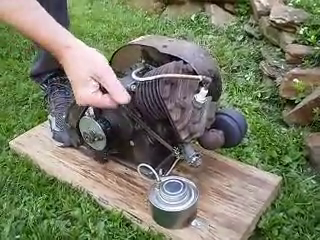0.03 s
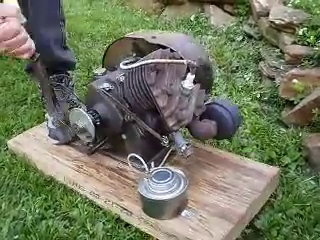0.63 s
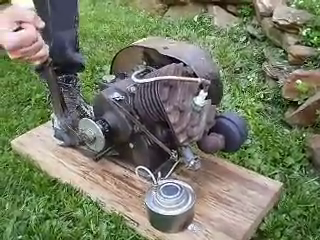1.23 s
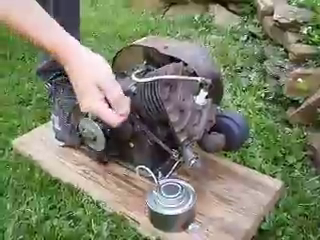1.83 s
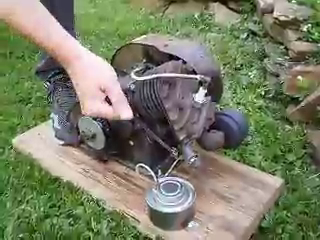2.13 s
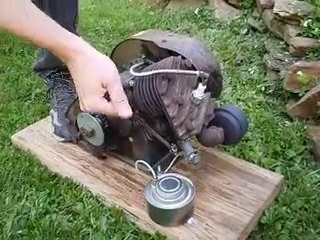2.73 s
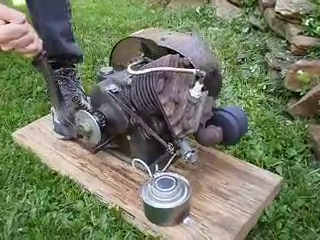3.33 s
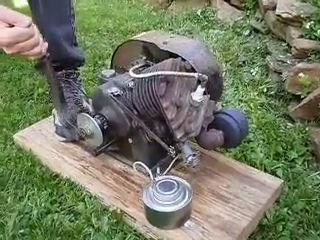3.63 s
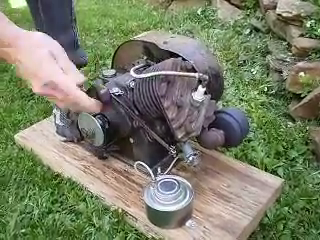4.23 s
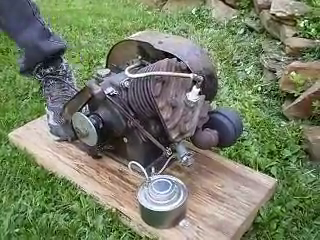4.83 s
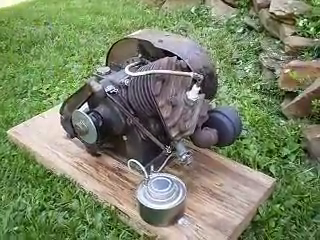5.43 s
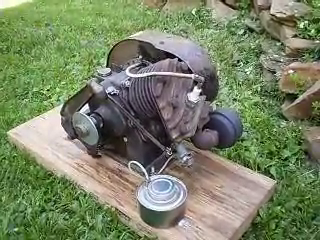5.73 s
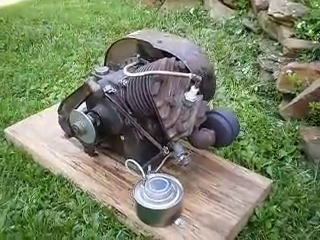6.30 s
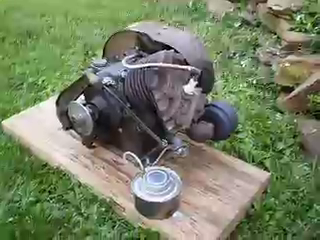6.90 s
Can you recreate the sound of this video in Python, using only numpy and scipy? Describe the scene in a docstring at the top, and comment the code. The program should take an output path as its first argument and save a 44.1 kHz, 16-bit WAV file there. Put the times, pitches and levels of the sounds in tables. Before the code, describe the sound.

A starter lever grinds and knocks outdoors; the single-cylinder engine fails once, then fires up into loud, regular bangs over metallic rattling.

```python
"""An old single-cylinder engine on a plank in a quiet garden is pulled over with a ratchet lever.
On the first pull the lever grinds and knocks; the engine only puffs, sucks and coasts to rest,
and the pawl rattles back. On the second pull, near 3 s, it sags, catches and races, then settles
into firing on every other cycle: bangs and soft chuffs ring the silencer over the clatter of
the valve gear. The bangs overload the microphone."""
import sys
import numpy as np
from scipy.fft import rfft, irfft, next_fast_len
from scipy.io import wavfile
from scipy.ndimage import map_coordinates

SR = 44100
rng = np.random.default_rng(int(sys.argv[2]) if len(sys.argv) > 2 else 0)


def to_wav(s):
    """Save 16-bit WAV."""
    ch = np.atleast_2d(s).T  # columns
    pcm = np.round(np.clip(ch, -1, 1) * 32767)  # PCM
    wavfile.write(sys.argv[1], SR, pcm.astype(np.int16))


N = 306936
TIME = np.arange(N) / SR
FULL_SPEED = 16  # cycles per second
KNOCK_T60_S = 0.047
# shaft speed as it coasts after the first pull: time_s, cycles_per_s
COAST_SPEED = [(.6752, 3.78), (.985, 2.72), (1.3, 2.05)]
# shaft speed after the second pull: time_s, cycles_per_s
RUN_SPEED = [(3.2028, 6.586), (3.661, 4.81), (3.78, 7.21), (4.061, 10.878), (4.477, 16.963),
             (4.761, 16.494), (5.195, 15.896), (6.385, 15.771), (6.96, 15.355)]


def exhaust(pitch_scatter=0.027, level_scatter_db=2.06):
    """A fired charge bangs in the silencer; an unfired one draws gas back in with a softer chuff."""
    # modes of the silencer can: pitch_hz, level_db, t60_s
    silencer = [(520.5, -13.5, 0.033), (1087, -5.5, 0.014), (1298, -2, 0.022), (1480, -7.5, 0.031),
                (2375, -12.5, 0.055), (2860, -20.5, 0.05), (3956, -9.5, 0.013)]
    out, jet = np.zeros(N), np.zeros(N)
    for (s, speed), fired in zip(shaft_passes(0), firing_cycles()[1]):
        size = amp(level_scatter_db * rng.normal())
        detune = 1 + pitch_scatter * rng.normal()
        pace = speed / FULL_SPEED
        pipe_db = -2 - 6 * np.log2(pace)  # the pipe stands out more at low speed
        if fired:
            wave = gas_wave(detune * 155.5 * pace ** 0.35, 305 * pace ** 0.32, pipe_db, pipe_t60=0.053)
            bang = ring(silencer, rise=0.00019, scatter_db=1.9)
            add(out, s, -size * speed_gain(speed, -14, 3.1) * wave)
            add(out, s + 0.001203, size * speed_gain(speed, -0.9, 1.5) * bang)
            add(jet, s + 0.0012, size * speed_gain(speed, -1, 0.88) * blow(0.0023, 0.045))
        else:
            wave = gas_wave(detune * 165 * pace ** 0.09, 285 * pace ** 0.34, pipe_db, pipe_t60=0.073)
            chuff = ring(silencer[:4], rise=0.001, scatter_db=1.0)
            add(out, s, size * speed_gain(speed, -15, 9.9) * wave)
            add(out, s + 0.0065, size * speed_gain(speed, 0.59, 13.5) * chuff)
            add(jet, s, size * speed_gain(speed, -6, 8.7) * blow(0.0036, 0.074))
    return out + shaken(jet, casting)


def gas_wave(hz, pipe_hz, pipe_db, pipe_t60):
    """Gas surges through the port and swings back for a period and a half; the pipe rings on."""
    t = TIME[:SR // 3]
    swing = np.sin(2 * np.pi * hz * t) * np.clip(8 * (1.5 - hz * t), 0, 1)
    pipe = np.sin(2 * np.pi * pipe_hz * rng.normal(1, 0.083) * t)
    return swing + amp(pipe_db) * blow(0.0053, pipe_t60) * pipe


def firing_cycles():
    """The times at which the exhaust opens, and whether each charge has burnt."""
    # firing pattern, counted anew at each row: start_s, every_nth_cycle
    ignition = [(3.2, 3), (3.7, 1), (4.47, 3), (4.65, 2), (4.83, 2)]
    starts = np.transpose(shaft_passes(0))[0]
    fired = np.zeros(len(starts), bool)
    for s, every in ignition:
        first = np.searchsorted(starts, s)
        fired[first:] = np.arange(len(starts) - first) % every == 0
    return starts, fired


def valve_gear(lag_s=0.002, lag_scatter_s=0.00081, scatter_db=2.06, firing_share=0.81):
    """Loose valves and piston strike late in their play, over whirring gears; ignition adds a knock."""
    # strikes in each cycle: cycle_share, full_speed_db, half_speed_loss_db, rise_s, t60_s
    strikes = [(0.159, -12.5, 8, .0018, 0.065), (0.299, -8, 2.5, 0.0027, 0.053),
               (0.568, -10.5, 4.5, 0.0012, 0.034), (.67, -23, 43, 0.00092, .035),
               (0.838, -14.5, 4.5, 0.00052, 0.015)]
    blows = np.zeros(N)
    for share, db, loss_db, rise, t60 in strikes:
        for s, speed in shaft_passes(share):
            size = speed_gain(speed, db + scatter_db * rng.normal(), loss_db)
            add(blows, s + lag_s + lag_scatter_s * rng.normal(), size * blow(rise, t60))
    starts, fired = firing_cycles()
    for s, speed in shaft_passes(firing_share):
        if fired[starts > s][:1].any():  # this charge will bang when the exhaust next opens
            add(blows, s + lag_s, speed_gain(speed, -14.5, 0.33) * blow(0.0014, 0.039))
    speed = shaft_speed(COAST_SPEED) + shaft_speed(RUN_SPEED)
    whirr = speed_gain(speed, -26.5, 5.8) * amp(wobble(130))
    acceleration = np.gradient(np.interp(TIME, *np.transpose(RUN_SPEED))) * SR
    strain = amp(0.2083 * np.maximum(acceleration, 0))  # louder clatter while gaining speed
    return shaken(np.hypot(blows, whirr) * strain, casting)


def casting(hz):
    """Gain of the engine's castings and shroud: a broad hump with sharper resonances."""
    # the body's broad colour: frequency_hz, density_db
    hump = [(60, -28), (150, -12), (400, -16.5), (650, -9.5), (850, -8), (1020, -0.5), (1500, 2.5),
            (1800, -5.5), (2200, -9), (3000, -10.5), (3800, -13.5), (4250, -27), (4700, -54), (5500, -100)]
    # its narrow peaks and one notch: centre_hz, width_hz, lift_db
    resonances = [(303.6, 13, 5), (438, 22, 6), (503, 10, 3.5), (783, 22, 6.5), (1005, 47, 6.5),
                  (1289, 50, 3), (1482, 27, -8.5), (1882, 44, 5), (2385, 190, 3.5), (2854, 118, 5),
                  (3375, 120, 2.5)]
    return amp(along(hump, hz) + sum(resonance(hz, *row) for row in resonances))


def knocks():
    """Lever and pawl strike the casting, some dull and some bright, and set the starter ringing."""
    # metal hits: start_s, level_db, treble_share_db
    hits = [(0.421, -20.5, -16), (0.457, -7.5, -14), (0.584, -12.5, -19), (0.621, 3, -16),
            (0.643, -8.5, -11), (0.908, -14, -11), (1.382, -16, -12.5), (1.434, -16, -20),
            (1.459, -13, -17), (1.502, -16.5, -22), (1.642, -22, -19), (1.718, -10, -31), (2.954, -1, -4),
            (3.003, -13, -4), (3.065, -8, -11), (3.097, 5, -19), (3.12, -5.5, -7.5)]
    # modes of the steel starter: pitch_hz, level_db, t60_s
    starter = [(978, 6, 0.32), (1633, 1.5, 0.37), (2470, -20, 0.5), (2590, -20.5, 0.4), (2930, -24, 0.24),
               (3472, -23, 0.7), (3540, -20, 0.21), (3700, -13.5, 0.33), (4070, -16.5, 0.2)]
    dull, bright, steel = np.zeros(N), np.zeros(N), np.zeros(N)
    for s, db, treble_db in hits:
        add(dull, s, amp(db - 6.5) * blow(0.00055, KNOCK_T60_S))
        add(bright, s, amp(db + treble_db) * blow(0.00087, KNOCK_T60_S))
        add(steel, s, amp(db + treble_db - 18) * ring(starter, rise=0.00043, scatter_db=6.0))
    lowpass = lambda hz: 1 / (1 + (hz / 2100) ** 8)
    clunks = shaken(dull, lambda hz: casting(hz) * lowpass(hz))
    clicks = shaken(bright, lambda hz: casting(hz) * (1 - lowpass(hz)))
    return steel + clunks + clicks


def lever(tooth_hz=170, ring_hz=995, casting_db=-11):
    """The toothed sector grinds over its pinion during each pull and shakes the casting."""
    # force on the teeth, one list a pull: time_s, level_db
    pulls = [
        [(.44, -44.5), (.46, -22), (.52, -28), (.575, -30.5), (.595, -15.5), (.64, -28), (.68, -31), (.72, -47)],
        [(2.9, -53), (2.93, -28.5), (2.95, -17.5), (3.0, -19.5), (3.055, -29), (3.075, -17), (3.125, -17.5),
         (3.17, -25.5), (3.2, -40)],
    ]
    # the lever's colour: frequency_hz, density_db
    spectrum = [(59, -49), (100, -31.5), (135, -19.5), (231, -15.5), (293, -14), (457, -25), (618, 0.5),
                (835, -11), (978, 2), (1240, 0), (1930, -18), (2530, -9), (3260, -41.5), (3800, -13),
                (4400, -34), (5720, -48), (9680, -120)]
    force = sum(level(pull) * (TIME < pull[-1][0]) for pull in pulls)
    tooth_phase = np.cumsum(tooth_hz * np.exp(0.22 * wobble(20))) / SR % 1
    grind = force * unit(amp(-9 * tooth_phase))  # each tooth bites, then eases
    sector = lambda hz: amp(along(spectrum, hz) + resonance(hz, ring_hz, width_hz=45, lift_db=7))
    return shaken(grind, sector) + amp(casting_db) * shaken(grind, casting)


def intake(open_share=0.3, close_share=0.55, hoot_hz=143.5):
    """Each intake stroke draws air through the carburettor with a hiss and a short low hoot."""
    out, hiss = np.zeros(N), np.zeros(N)
    for s, speed in shaft_passes(open_share):
        length = (close_share - open_share) / speed
        t = TIME[:round(length * SR)]
        flow = np.sin(np.pi * t / length)
        phase = 2 * np.pi * hoot_hz * t * (1 + 0.083 * (1 - t / length))  # glides down
        hoot = np.sin(phase) + amp(-7.5) * np.sin(2 * phase)
        add(out, s, speed_gain(speed, -33.5, 1) * flow * hoot)
        add(hiss, s, speed_gain(speed, -20.5, 4.8) * flow)
    return out + shaken(hiss, casting)


def pawl_rattle(start_s=1.45, end_s=1.86, ticks_per_s=36, start_db=-32, fade_db_per_s=14):
    """The pawl skips unevenly over the teeth, ever more lightly, as the lever returns."""
    ticks = np.zeros(N)
    for s in np.arange(start_s, end_s, 1 / ticks_per_s):
        db = start_db - fade_db_per_s * (s - start_s) + 1.1 * rng.normal()
        add(ticks, s + 0.005 * rng.normal(), amp(db) * blow(0.00022, KNOCK_T60_S))
    return shaken(ticks, casting)


def garden(hum_hz=87.4):
    """Steady outdoor hiss, a wavering far drone and a low hum,
    heard quieter after the first pull and louder before the second."""
    # colour of the outdoor air: frequency_hz, density_db
    air_spectrum = [(15, -64.5), (25, -31.5), (53, -24), (82, -17), (232, -29), (270, -23), (464, -26),
                    (588, -23), (763, -22.5), (814, -21.5), (1770, -20.5), (3860, -27), (4400, -47),
                    (5720, -85.5), (9680, -120)]
    # partials of the far drone: pitch_hz, level_db
    partials = [(834.4, -66.5), (1147, -60.5), (1443, -63), (1776, -66.5)]
    # level of the hum in the mix: time_s, level_db
    hum_level = [(0, -55), (.7, -55), (1.2, -67), (1.9, -58.5), (2.45, -53), (2.9, -51), (3.2, -56.5)]

    def tone(hz, waver):
        return np.sqrt(2) * np.sin(2 * np.pi * np.cumsum(hz * (1 + waver * wobble(14))) / SR)

    air = shaken(amp(-48 + 0.99 * wobble(4)), lambda hz: amp(along(air_spectrum, hz)))
    drone = sum(amp(db + 3 * wobble(9)) * tone(hz, waver=0.012) for hz, db in partials)
    return air + drone + level(hum_level) * tone(hum_hz, waver=0.029)


def shaft_speed(curve):
    """Cycles per second at each sample, zero while the shaft rests."""
    return np.interp(TIME, *np.transpose(curve), left=0, right=0)


def shaft_passes(share):
    """(time_s, speed) whenever the shaft passes this share of its cycle; at 0 the exhaust opens."""
    rows = []
    for speed in shaft_speed(COAST_SPEED), shaft_speed(RUN_SPEED):
        cycles = np.cumsum(speed) / SR
        at = np.searchsorted(cycles, np.arange(share, cycles[-1]), side="right")
        rows += zip(TIME[at], speed[at])
    return rows


def speed_gain(speed, full_speed_db, loss_db):
    """Gain of a part that drops by loss_db each time the speed halves."""
    return amp(full_speed_db + loss_db * np.log2(np.maximum(speed / FULL_SPEED, 1e-6)))


def blow(rise, t60):
    """Envelope of one blow; rise and t60 in seconds."""
    t = TIME[:SR // 3]
    return (1 - np.exp(-t / rise)) * amp(-60 * t / t60)


def ring(modes, rise, scatter_db):
    """One strike of (pitch_hz, level_db, t60_s) modes, each at a new strength and phase."""
    t = TIME[:SR // 3]
    out = np.zeros(len(t))
    for hz, db, t60 in modes:
        envelope = amp(db + scatter_db * rng.normal()) * blow(rise, t60)
        out += envelope * np.sin(2 * np.pi * (hz * t + rng.random()))
    return out


def shaken(envelope, gain):
    """Noise coloured by a body's gain, like dense tiny impacts; its rms follows the envelope."""
    rms_gain = np.sqrt(np.mean(gain(np.linspace(0, SR / 2, SR // 8)) ** 2))
    return colour(envelope * rng.standard_normal(N), gain) / rms_gain


def colour(x, gain):
    """x through the causal filter whose gain is a function of frequency."""
    size = 2 * next_fast_len(N // 2 + SR // 4)
    hz = np.fft.rfftfreq(size, 1 / SR)
    cepstrum = irfft(np.log(np.maximum(gain(hz), 1e-6)))
    cepstrum[1:size // 2] *= 2  # minimum phase: nothing rings before its hit
    cepstrum[size // 2 + 1:] = 0
    return irfft(rfft(x, size) * np.exp(rfft(cepstrum)), size)[:N]


def resonance(hz, centre_hz, width_hz, lift_db):
    """A bell-shaped lift in dB."""
    return lift_db / (1 + (2 * (hz - centre_hz) / width_hz) ** 2)


def along(points, hz):
    """A curve through (frequency_hz, value) points on a log axis."""
    knots_hz, values = np.transpose(points)
    return np.interp(np.log(hz + 1), np.log(knots_hz + 1), values)


def level(rows):
    """Gain per sample from (time_s, level_db) rows, silent before the first."""
    return amp(np.interp(TIME, *np.transpose(rows), left=-120))


def wobble(rate):
    """A smooth random curve, rate knots a second."""
    return map_coordinates(rng.standard_normal(int(N * rate / SR) + 4), [TIME * rate / SR])


def add(track, s, sound):
    """Mix a sound into a track at time s."""
    part = track[max(round(s * SR), 0):][:len(sound)]
    part += sound[:len(part)]


def amp(db):
    return 10 ** (np.asarray(db) / 20)


def unit(x):
    return x / np.sqrt(np.mean(x ** 2) + 1e-20)


def scene():
    """Engine, starter and garden in one mono mix."""
    mix = exhaust() + valve_gear() + knocks() + pawl_rattle() + lever() + intake() + garden()
    return mix[None]


def record(dry, edge_hz=4200, ceiling=0.82, top_hz=16200):
    """A narrow-band microphone overloaded by the bangs: only their clipping reaches the high treble."""
    hz = np.fft.rfftfreq(N + SR, 1 / SR)
    narrow = irfft(rfft(dry, N + SR) / np.sqrt(1 + (hz / edge_hz) ** 60), N + SR)
    clipped = narrow / (1 + np.abs(narrow / ceiling) ** 16) ** (1 / 16)
    return irfft(rfft(clipped) * (hz < top_hz), N + SR)[:, :N]


dry = scene()
out = record(dry)
to_wav(out)
```